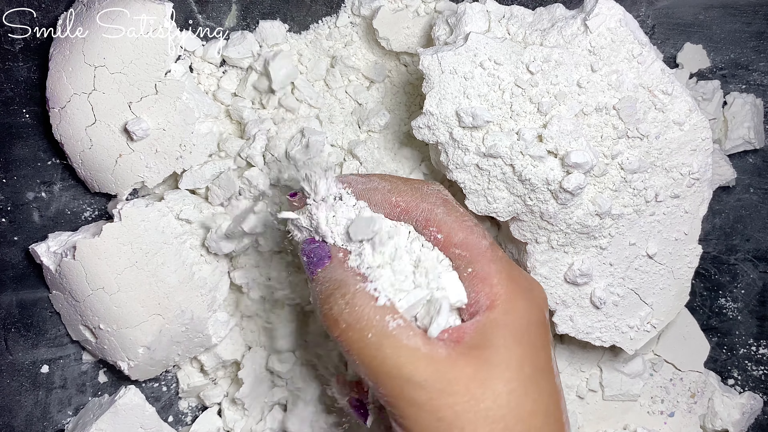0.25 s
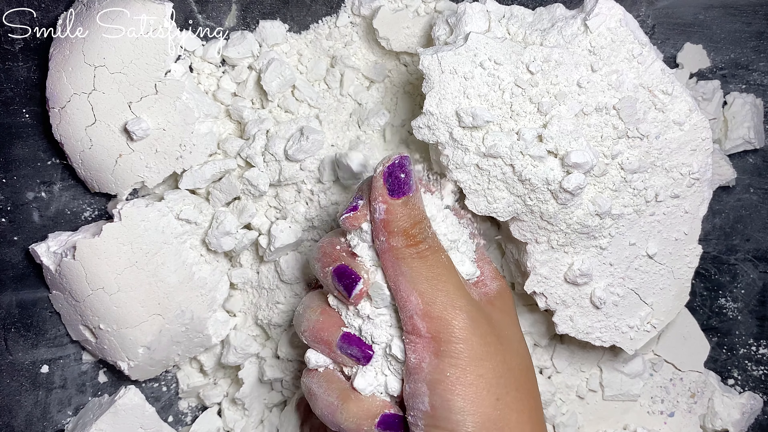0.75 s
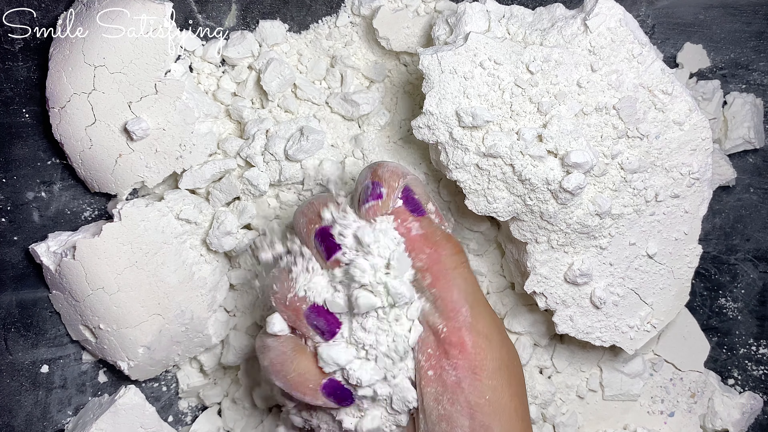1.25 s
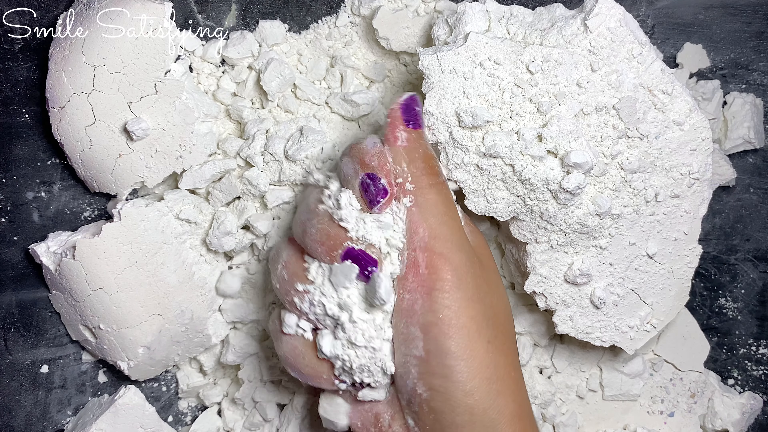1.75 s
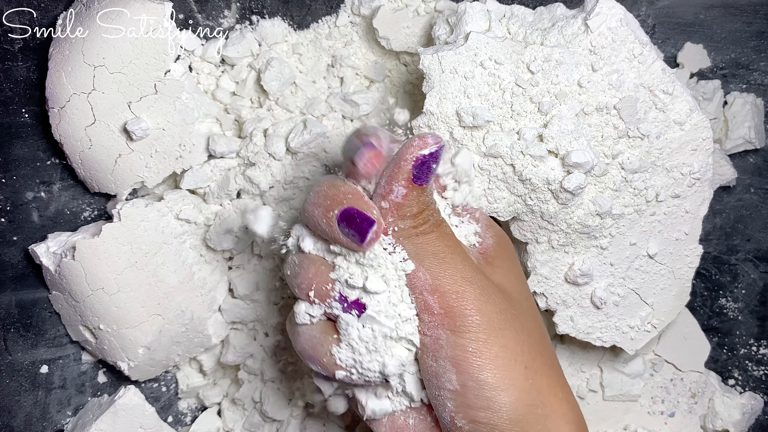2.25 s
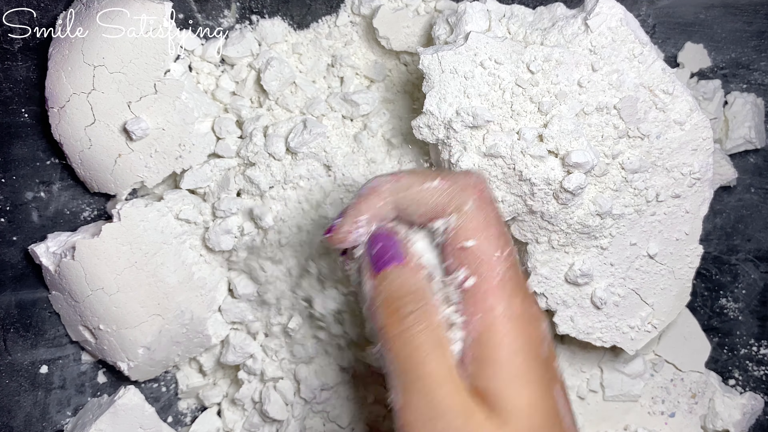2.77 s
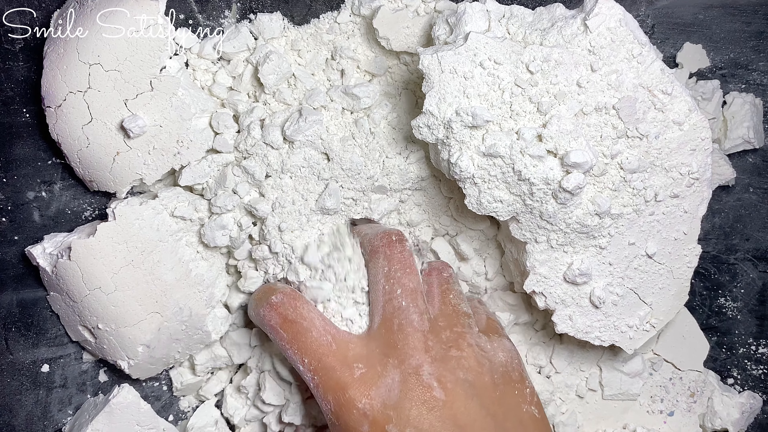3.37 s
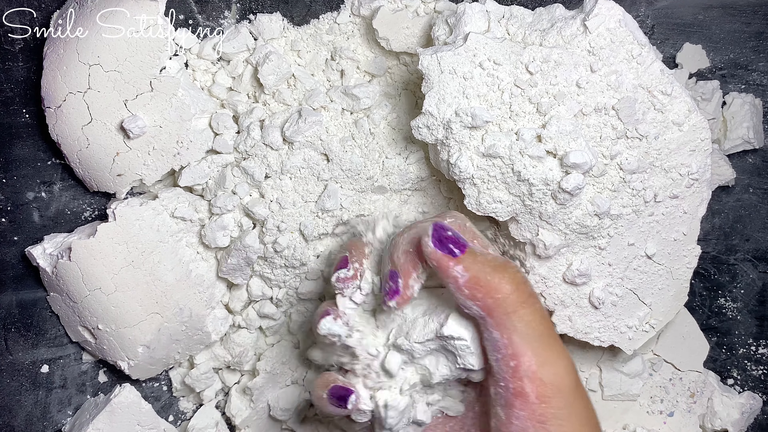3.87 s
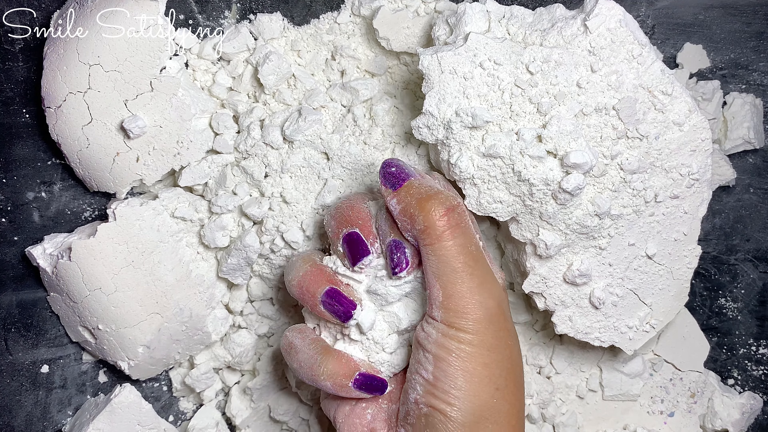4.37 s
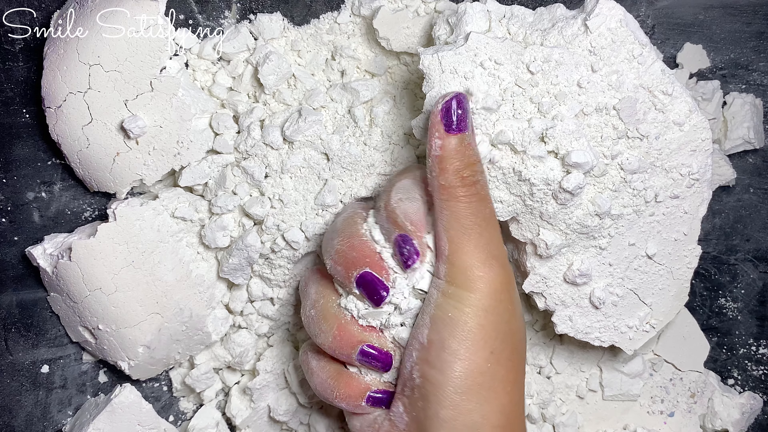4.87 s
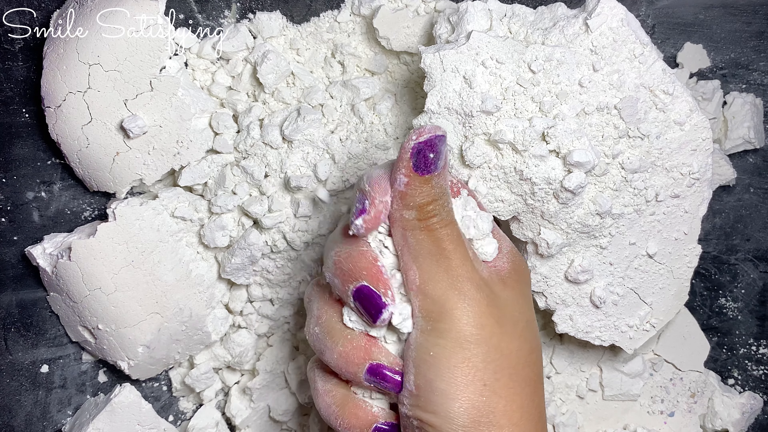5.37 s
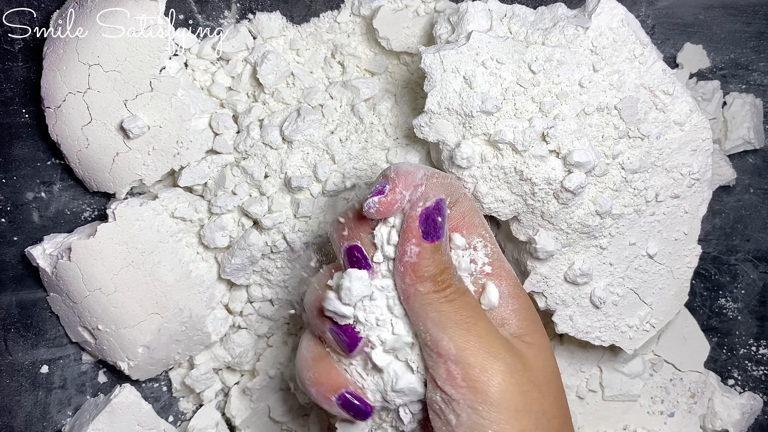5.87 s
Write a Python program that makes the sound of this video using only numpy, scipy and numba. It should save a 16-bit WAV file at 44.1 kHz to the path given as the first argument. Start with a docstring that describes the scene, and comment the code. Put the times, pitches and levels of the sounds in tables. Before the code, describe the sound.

A hand squeezes and crumbles dry starch lumps close up, with crisp cracks, trickling crumbs and low, powdery crunches.

```python
"""A quiet room, a tray just below a phone's two microphone ports: a hand scoops, squeezes and crumbles
dry starch lumps. Lumps crack with a short ring and a bright snap, and pieces land with a dull thud.
Crumbs and dust trickle between the fingers; packed powder slips in a low crunch when it is squeezed or
shoved, and the tray hums under the hand. The starch is built from tiny damped grains and a fine hiss."""
import sys
import numpy as np
from scipy import signal
from scipy.fft import rfft, irfft, next_fast_len
from scipy.io import wavfile
from numba import njit

SR = 44100
rng = np.random.default_rng(int(sys.argv[2]) if len(sys.argv) > 2 else 0)


def master_out(mix):
    """Clip the mix to full scale and print it as 16-bit PCM to the path in sys.argv[1]."""
    frames = np.transpose(np.atleast_2d(mix))
    ceiling = np.clip(frames, -1, 1)
    pcm = np.round(ceiling * 32767).astype(np.int16)
    wavfile.write(sys.argv[1], SR, pcm)


N = 270024
PLACES = 6  # spots on the tray, each with its own stereo phase and tail
KNOCK_HZ, UPPER_HZ = 1994, 5170  # the hollow of the cupped hand colours every break at two pitches

# lumps that crack: t/s, ring level/dB, ring f/Hz, snap level/dB
LUMP_CRACKS = [(0.096, -18.5, 1130, -58), (0.1652, -51, 4870, -22), (0.249, -18.5, 2070, -23),
               (0.3405, -23.5, 3240, -37), (0.412, -25, 1780, -52), (0.43, -14, 4500, -26),
               (0.48, -28, 2700, -22.5), (0.576, -21, 1280, -24.5), (0.618, -16, 2800, -29),
               (0.677, -37, 3970, -25), (0.683, -17, 1410, -46), (0.7317, -19, 3080, -19.5),
               (0.7558, -52, 2350, -28), (0.772, -20, 1470, -28), (0.804, -15.5, 2100, -31),
               (0.818, -21, 2000, -36), (0.8482, -10, 4300, -32), (0.871, -26, 2400, -31),
               (0.915, -17.5, 3830, -34), (0.9213, -28, 3120, -19), (0.931, -19, 3500, -38),
               (0.954, -22, 2560, -25.5), (0.995, -19.5, 2580, -26), (1.02, -16.5, 2300, -32),
               (1.044, -9.5, 1720, -26), (1.179, -19, 2670, -32), (1.212, -17, 2110, -35),
               (1.229, -12, 1520, -50), (1.238, -16, 1800, -45), (1.253, -17.5, 1670, -51),
               (1.2803, -16.5, 2140, -48), (1.2878, -23, 1980, -49), (1.4163, -35, 5300, -29),
               (1.4658, -19, 2210, -39), (1.4761, -14.5, 3570, -27.5), (1.52, -16.5, 2000, -25),
               (1.5576, -2.5, 2520, -23), (1.5702, -13, 2200, -12), (1.6352, -22, 3480, -18.5),
               (1.749, -9.5, 2270, -23.5), (1.9658, -11.5, 3500, -10.5), (1.968, -23, 3020, -37),
               (1.9765, -14.5, 2880, -11), (1.983, -12, 1850, -10), (1.989, -24, 3200, -18),
               (1.995, -22, 3540, -20), (2.042, -30, 5200, -15), (2.0538, -42, 3800, -19),
               (2.088, -29.5, 2740, -30), (2.185, -30.5, 3080, -70), (2.2625, -19, 3230, -25.5),
               (2.2767, -16, 2690, -22), (2.293, -24, 2690, -22), (2.3242, -16.5, 3160, -25),
               (2.381, -25.5, 3020, -33), (2.441, -29.5, 2050, -45), (2.461, -52, 4680, -27),
               (2.513, -26, 3700, -10.5), (2.5176, -5.5, 4540, -15), (2.522, -12, 4050, -16),
               (2.646, -41, 3560, -28.5), (2.679, -25.5, 2230, -28.5), (2.704, -23, 4030, -32),
               (2.712, -22, 2670, -36), (2.7316, -13.5, 3320, -23.5), (2.75, -19, 3570, -20),
               (2.7814, -18.5, 2780, -21), (2.846, -11.5, 3200, -31), (2.857, -12.5, 3400, -25),
               (2.9172, -20.5, 1930, -39), (2.969, -16.5, 3100, -32), (3.1529, -7, 5300, -35),
               (3.2467, -15, 1340, -21), (3.8256, -25, 2040, -27), (3.893, -29, 2910, -27.5),
               (3.927, -17.5, 3270, -25.5), (3.9568, -30, 2200, -36), (3.978, -24, 2430, -27),
               (4.039, -29, 2470, -50), (4.063, -27.5, 2110, -42), (4.098, -19.5, 3760, -56),
               (4.128, -59, 3570, -25), (4.145, -26, 1760, -27.5), (4.171, -33, 2000, -40),
               (4.273, -20, 2070, -27), (4.2946, -24.5, 2080, -30.5), (4.312, -27, 2170, -48),
               (4.361, -10.5, 2210, -18), (4.3644, -15, 2920, -21.5), (4.368, -21, 2200, -34),
               (4.403, -14.5, 2160, -29), (4.4123, -19.5, 4950, -17.5), (4.4383, -29, 2230, -33),
               (4.505, -25, 2190, -45), (4.5123, -20.5, 2620, -26), (4.5203, -20, 2420, -38),
               (4.5385, -21, 2410, -34), (4.5564, -25, 2360, -49), (4.5709, -12, 4000, -16),
               (4.6028, -24, 2830, -37), (4.6248, -18.5, 3580, -22.5), (4.683, -14, 3840, -18),
               (4.7089, -25, 3550, -23), (4.738, -21, 3580, -30), (4.773, -27, 4170, -44),
               (4.865, -20, 3500, -44), (4.871, -36, 4400, -29), (4.8845, -36, 3600, -43),
               (5.0485, -27, 2050, -29), (5.099, -29, 1780, -33), (5.123, -25, 2300, -40),
               (5.131, -20.5, 3170, -27), (5.17, -24, 2000, -21), (5.201, -15, 2390, -24),
               (5.241, -22, 1910, -45), (5.253, -11, 2160, -43), (5.268, -11.5, 1820, -39),
               (5.2957, -18, 2630, -30), (5.303, -15, 1920, -26), (5.344, -19.5, 1710, -49),
               (5.4445, -12, 2270, -58), (5.4648, -19, 1950, -43), (5.485, -25, 2700, -37),
               (5.496, -15, 2960, -36), (5.5375, -10, 2210, -15.5), (5.5856, -25, 2400, -45),
               (5.624, -20, 4080, -20), (5.6283, -17.5, 2670, -24), (5.7832, -16, 1450, -40),
               (5.894, -13, 1820, -27), (5.983, -37, 2950, -22.5), (6.0218, -13.5, 1440, -42),
               (6.038, -11.5, 2030, -18.5), (6.068, -25, 2970, -25)]
def cracks():
    """A lump splits: a sagging ring, a hollow knock (strongest near the hand's pitch), a snap, splinters."""
    t, ring_db, hz, snap_db = np.transpose(LUMP_CRACKS)
    place = np.arange(len(t)) % PLACES
    pan_db = 3 * (rng.random(len(t)) - .5)
    knock_db = ring_db - 8.5 - 7.8 * np.abs(np.log2(hz / KNOCK_HZ))
    ring = bursts(t, ring_db + 4, hz, place, pan_db,
                  count=6, spread_s=.0003, octaves=.8, cycles=1.11, sag=.08)
    knock = bursts(t, knock_db, KNOCK_HZ, place, pan_db,
                   count=2, spread_s=.00027, octaves=.16, cycles=1.7)
    upper = bursts(t, ring_db - 9.5, UPPER_HZ, place, pan_db,
                   count=3, spread_s=.00028, octaves=.21, cycles=2.85)
    snap = bursts(t, snap_db + 11.5, 10300, place, pan_db,
                  count=10, spread_s=.00034, octaves=1.15, cycles=1.48)
    splinters = bursts(t + .003, ring_db - 13, 1.1 * hz, place, pan_db,
                       count=10, spread_s=.002, octaves=1.8, cycles=1.4)
    return ring + knock + upper + snap + splinters


def spills():
    """Every crack sheds a short spill: dB envelopes for crumbs and dust."""
    t, ring_db, _, snap_db = np.transpose(LUMP_CRACKS)
    return [swells(t, 0 * t, db, rise_s=.0072, fall_s=.03) for db in (ring_db - 24.5, snap_db - 28)]


# a fistful crushed or scraped at once: t/s, hold/s, crumb level/dB, squeeze level/dB
FISTFULS = [(0.067, 0.041, -66, -25), (0.636, 0.014, -38, -32.5), (1.22, 0.088, -40, -23),
            (2.68, 0.088, -51.5, -61), (2.84, 0.02, -42, -40), (3.134, 0.076, -31.5, -17.5),
            (3.25, 0.11, -29.5, -13), (3.592, 0.048, -40, -36), (4.12, 0.074, -43, -42),
            (4.957, 0.067, -35.5, -42), (5.169, 0.12, -34, -32), (5.359, 0.042, -38, -35),
            (5.664, 0.034, -32, -49), (5.74, 0.049, -34.5, -36.5), (5.99, 0.022, -33.5, -36)]
def crunches():
    """A fistful gives way in one quick swell: dB envelopes for crumbs and squeeze."""
    t, hold_s, *levels = np.transpose(FISTFULS)
    return [swells(t, hold_s, db, rise_s=.016, fall_s=.016) for db in levels]


# fingers working the powder: t/s, crumb level/dB, dust level/dB, squeeze level/dB
FINGERWORK = [(0, -43, -58, -26), (.33, -41.5, -51.5, -36), (.52, -43, -56, -35), (.9, -36.5, -50, -34.5),
              (1.12, -42, -52, -38), (1.5, -38, -50.5, -25), (1.7, -41, -56, -37.5),
              (1.94, -48.5, -53.5, -50), (2.17, -59.5, -64, -73), (2.3, -49, -56, -49),
              (2.62, -51, -60, -67), (2.72, -41, -40, -48.5), (2.88, -32.5, -48.5, -41.5),
              (3.04, -43.5, -48.5, -41.5), (3.45, -35.5, -45.5, -24), (3.66, -42, -51.5, -35),
              (3.76, -48, -55.5, -42), (3.98, -41.5, -53.5, -47), (4.25, -53, -68, -52.5),
              (4.55, -44.5, -57.5, -60), (4.86, -46, -49.5, -40.5), (4.91, -65, -62, -65),
              (5.1, -39, -52.5, -44.5), (5.49, -32.5, -46.5, -48), (5.61, -46, -63, -38),
              (5.85, -35.5, -47, -31), (6.12, -34, -43, -33)]
def rubbing(crush_db, press_db):
    """The fingers keep crumbs, dust and squeeze running; crunches and spills ride on these dB envelopes."""
    crumb_db, dust_db, squeeze_db = curves(FINGERWORK, np.arange(N) / SR)
    spilt_crumb_db, spilt_dust_db = spills()
    return (power_db(crumb_db, crush_db, spilt_crumb_db),
            power_db(dust_db, crush_db - 9.5, spilt_dust_db),
            power_db(squeeze_db, press_db))


def crumbs(crumb_db, dust_db, crush_db):
    """Crumbs tick with a body and a dusty edge over fine hiss; a crushed fistful rings in the hand."""
    t, db, place, pan_db, tone = trickle(per_s=600, scatter_db=1, top_db=7.5)
    hz = 2300 * 2 ** (2.2 * (tone - .5))
    body = bursts(t, db, hz, place, pan_db, count=5, spread_s=.0009, octaves=.8, cycles=1.7)
    edge = bursts(t, db + 7.8 * tone, 9500, place, pan_db,
                  count=6, spread_s=.0012, octaves=1.6, cycles=.5)
    hiss = rng.standard_normal((PLACES, N))
    hollow = unit(band(body + undb(2) * hiss * body.std(), .76 * KNOCK_HZ, 1.384 * KNOCK_HZ))
    body = unit(unit(body) + undb(-3.5) * unit(band(hiss, 920, 5480)))
    edge = unit(unit(edge) + undb(-2.5) * unit(band(hiss, 4450, 14200)))
    grit = undb(crumb_db - 10) * body + undb(dust_db - 3) * edge + undb(crush_db - 19) * hollow
    return undb(2.2 * drift(knots=300)) * grit  # in fits, as the fingers stick and slip


# pieces that drop or slip on the heap: t/s, level/dB, f/Hz
FALLING_PIECES = [(0.1, -24, 504), (0.283, -22.5, 224), (0.32, -20.5, 455), (0.4126, -20, 904),
                  (0.4344, -16.5, 900), (0.575, -17, 876), (0.734, -23, 814), (0.849, -19.5, 840),
                  (1.239, -12, 745), (1.264, -12.5, 660), (1.572, -10, 693), (1.595, -16, 690),
                  (1.987, -30.5, 650), (2.522, -31, 610), (2.919, -20.5, 870), (3.098, -17.5, 440),
                  (3.14, -9.5, 456), (3.158, -3.5, 392), (3.238, -7.5, 350), (3.287, -5, 473),
                  (3.312, -8, 637), (3.332, -7, 630), (3.358, -8, 390), (3.378, -12.5, 540),
                  (3.583, -16.5, 456), (3.6, -20, 342), (3.824, -17.5, 564), (4.064, -29, 790),
                  (4.4055, -23.5, 870), (4.523, -28.5, 696), (5.1, -25, 820), (5.242, -17, 714),
                  (5.269, -24, 700), (5.758, -21.5, 336), (5.897, -17.5, 760), (5.933, -14, 410)]
def thuds():
    """Soft pieces land on powder: a dull blow that crumbles away."""
    t, db, hz = np.transpose(FALLING_PIECES)
    place = np.arange(len(t)) % PLACES
    blow = bursts(t - .0008, db + 2, hz, place,
                  count=7, spread_s=.001233, octaves=.26, cycles=1.3, sag=.19)
    crumble = bursts(t + .00597, db - 4.5, hz, place, count=10, spread_s=.00455, octaves=.51, cycles=.55)
    return band(blow + crumble, 215, 3100)


# a soft lump and its bounce: t/s, level/dB
LUMP_PLOPS = [(4.149, -22.5), (4.173, -30)]
def plops():
    """A soft lump hits the tray with a round, low blow."""
    t, db = np.transpose(LUMP_PLOPS)
    return band(bursts(t, db, hz=260, place=0, count=1, spread_s=0, octaves=0, cycles=2.3), 210, 480)


def slips(lo_hz, hi_hz, per_s):
    """Packed powder gives way in dense, dull one-cycle slips."""
    t, db, place, _, tone = trickle(per_s, scatter_db=3.5, top_db=14)
    hz = lo_hz * (hi_hz / lo_hz) ** tone
    grains = bursts(t, db, hz, place, count=2, spread_s=.00111, octaves=.64, cycles=.76)
    grains = band(grains, .9 * lo_hz, 1.6 * hi_hz)
    return unit(band(grains, .5 * lo_hz, 1.15 * hi_hz))


def heap(squeeze_db, shove_db):
    """Squeezed powder crunches; the whole heap rumbles deeper when it is shoved."""
    crunch = undb(squeeze_db - 16) * slips(354, 1120, per_s=1400)
    rumble = undb(shove_db - 19) * slips(117, 357, per_s=400)
    return crunch + rumble


# the hand bumps and shoves the heap: t/s, hold/s, heap level/dB, tray level/dB
HEAP_SHOVES = [(0.036, 0.061, -23.5, -33), (0.126, 0.086, -41, -29), (0.276, 0.077, -23.5, -33.5),
               (0.697, 0.12, -37.5, -43.5), (1.056, 0.047, -22.5, -33.5), (1.233, 0.38, -41, -45),
               (1.975, 0.021, -41, -56), (2.29, .06, -43, -51), (2.756, 0.24, -39, -48),
               (3.123, 0.12, -18.5, -42), (3.238, 0.13, -14, -29), (3.548, 0.085, -28, -50),
               (3.795, 0.067, -42, -38.5), (4.543, 0.023, -45, -46), (4.98, 0.012, -38.5, -42.5),
               (5.746, 0.077, -40, -29), (5.953, 0.11, -30.5, -57)]
def shoves():
    """A shove stirs the heap and, a little longer, the tray: dB envelopes over a faint resting floor."""
    t, hold_s, shove_db, tray_db = np.transpose(HEAP_SHOVES)
    return (power_db(-51.5, swells(t, hold_s, shove_db, rise_s=.018, fall_s=.052)),
            power_db(-57.5, swells(t, hold_s, tray_db, rise_s=.018, fall_s=.087)))


# the tray's low modes: f/Hz, waver/Hz, relative level/dB
TRAY_MODES = [(58.6, 2.9, 24), (78.5, 8.6, 18.5)]
def tray(tray_db):
    """The tray hums when the hand leans on it; each mode wavers around its pitch."""
    hum = 0
    for hz, waver_hz, db in TRAY_MODES:
        pitch = hz + waver_hz * drift(knots=120)
        hum = hum + undb(db) * np.sin(2 * np.pi * np.cumsum(pitch) / SR)
    rumble = unit(band(rng.standard_normal((2, N)), 11, 270))  # loose, and different at each port
    return undb(tray_db - 7) * (unit(hum) + undb(-5) * rumble)


def echoes(x, t60_s, db):
    """Tray, heap and walls send back a short diffuse tail."""
    t = np.arange(int(t60_s * SR)) / SR
    tail = rng.standard_normal((1, PLACES, len(t))) * 1000. ** (-t / t60_s)
    tail *= undb(db) / np.sqrt(np.sum(tail ** 2, axis=-1, keepdims=True))
    return x + signal.fftconvolve(x, tail, axes=-1)[..., :N]


def room():
    """A faint, steady bed of air."""
    return undb(-79) * unit(band(rng.standard_normal((PLACES, N)), 200, 9000))


# the two ports: f/Hz, right phase lead/rad, phase spread over places/rad, left minus right/dB, colour/dB
PORT_RESPONSE = [(0, 0, .12, 0, 0), (250, .2, .28, -1.2, 0), (500, .5, .55, -2.5, 0), (900, .9, .9, -4, 0),
                 (1300, .3, 1.1, -3, -5), (1900, -.05, .8, -2.4, 1), (2300, -.2, 1.3, -3.5, 0),
                 (2700, -.6, 2.0, -6, -1.5), (4500, -.4, 1.5, -4.5, 0), (5300, -.6, .55, -2.3, 0),
                 (6300, -2.0, .55, 0, 2), (7300, -3.15, .35, -.3, 0), (10500, -6.3, .5, -.3, 0),
                 (13700, -9.5, .6, -.6, -6), (15600, -11.9, 1.0, -.4, -12), (16100, -12.4, 1.0, -.4, -22),
                 (17000, -13.5, 1.0, -.4, -26)]
def ports(x):
    """Mixes the places to stereo: treble reaches the right port late, and each place has its own phase."""
    size = next_fast_len(N + 512)
    f = np.fft.rfftfreq(size, 1 / SR)
    lead, spread, pan_db, colour_db = curves(PORT_RESPONSE, f)
    knots = rng.standard_normal((PLACES, 24))
    knots = (knots - knots.mean(axis=0)) / knots.std(axis=0)
    wander = np.array([np.interp(f, np.linspace(0, SR / 2, len(k)), k) for k in knots])
    left, right = rfft(x, size)
    right = right * np.exp(1j * (lead + spread * wander))
    left = left.sum(axis=0) * undb(colour_db + pan_db / 2)
    right = right.sum(axis=0) * undb(colour_db - pan_db / 2)
    return irfft(np.array([left, right]), size)[:, :N]


def bursts(t, db, hz, place, pan_db=0, *, count, spread_s, octaves, cycles, sag=0):
    """Each break is a quick run of scattered grains that builds and dies; sag lowers the later ones."""
    chance = rng.random((len(t), count, 5))
    late = -np.log((1 - chance[..., 0]) * (1 - chance[..., 4]))
    detune = octaves * (chance[..., 1] - .5) - sag * (late - 1)
    pitch = np.clip(np.reshape(hz, (-1, 1)) * 2 ** detune, 40, .4 * SR)
    size = np.sign(chance[..., 2] - .5) * (.54 + chance[..., 3]) * late * np.exp(-late)
    size *= undb(db)[:, None] / np.sqrt(np.sum(size ** 2, axis=1, keepdims=True))  # shared energy
    start_s = t[:, None] + spread_s * (late - 1) - .5 / pitch
    start = (start_s * SR).astype(np.int64).clip(0, N - 1)
    per_grain = lambda v: np.repeat(np.broadcast_to(v, len(t)), count)
    left, right = per_grain(undb(pan_db / 2)), per_grain(undb(-pan_db / 2))
    return ring_grains(per_grain(place), start.ravel(), pitch.ravel(), cycles, size.ravel(), left, right)


@njit
def ring_grains(place, start, hz, cycles, size, left, right):
    """Each grain is a damped sine that falls to 1/e in so many cycles."""
    out = np.zeros((2, PLACES, N))
    for k in range(len(hz)):
        pole = np.exp((2j * np.pi - 1 / cycles) * hz[k] / SR)
        swing = size[k] + 0j
        for i in range(start[k], min(start[k] + int(6 * cycles * SR / hz[k]), N)):
            out[0, place[k], i] += left[k] * swing.imag
            out[1, place[k], i] += right[k] * swing.imag
            swing *= pole
    return out


def trickle(per_s, scatter_db, top_db):
    """Random ticks, many small and a few larger: t/s, level/dB, place, pan/dB, tone (0 to 1)."""
    when, size, where, pan, tone = rng.random((int(per_s * N / SR), 5)).T
    db = np.minimum(-scatter_db * np.log(1 - size), top_db)
    return when * N / SR, db, (where * PLACES).astype(np.int64), 4 * (pan - .5), tone


def swells(starts, hold_s, db, rise_s, fall_s):
    """The dB envelope of events that rise, hold and die away."""
    t, power = np.arange(0, N, 32) / SR, 1e-12
    for start, hold, gain in zip(starts, hold_s, undb(db)):
        attack = np.minimum((t - start) / rise_s, 0)
        release = np.maximum(t - start - hold, 0) / fall_s
        power = power + (gain * np.exp(attack - release)) ** 2
    return np.interp(np.arange(N) / SR, t, 10 * np.log10(power))


def curves(table, axis):
    """Each later column drawn as a curve over the first."""
    points, *columns = np.transpose(table)
    return [np.interp(axis, points, c) for c in columns]


def drift(knots):
    """A slow random wobble."""
    return np.interp(np.arange(N), np.linspace(0, N, knots), rng.standard_normal(knots))


def power_db(*layers_db):
    """Levels of unrelated sounds add as powers."""
    return 10 * np.log10(sum(undb(db) ** 2 for db in layers_db))


def undb(db):
    return 10 ** (np.asarray(db) / 20)


def unit(x):
    """Scaled to rms 1."""
    return x / np.sqrt(np.mean(x ** 2))


def band(x, lo_hz, hi_hz):
    """Band-pass with gentle skirts."""
    return signal.sosfilt(signal.butter(2, [lo_hz, hi_hz], "band", fs=SR, output="sos"), x)


def scene():
    """Brittle breaks up front, soft blows and the heap below, room air and tray hum behind."""
    crush_db, press_db = crunches()
    crumb_db, dust_db, squeeze_db = rubbing(crush_db, press_db)
    shove_db, tray_db = shoves()
    brittle = cracks() + crumbs(crumb_db, dust_db, crush_db)
    brittle = band(brittle, 510, .45 * SR)  # small pieces radiate no bass
    starch = brittle + thuds() + plops() + heap(squeeze_db, shove_db)
    return ports(echoes(starch, t60_s=.03, db=-12) + room()) + tray(tray_db)


def record(dry):
    """The phone drops the deepest bass and cuts the top."""
    x = signal.sosfilt(signal.butter(4, 50, "high", fs=SR, output="sos"), dry)
    return signal.sosfilt(signal.ellip(10, .2, 80, 16900, fs=SR, output="sos"), x)


dry = scene()
out = record(dry)
master_out(out)
```